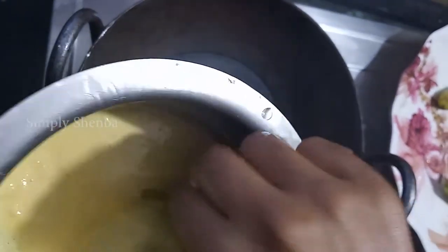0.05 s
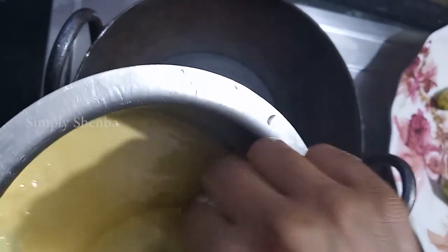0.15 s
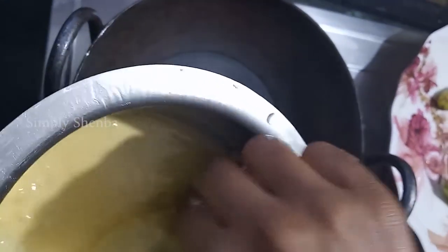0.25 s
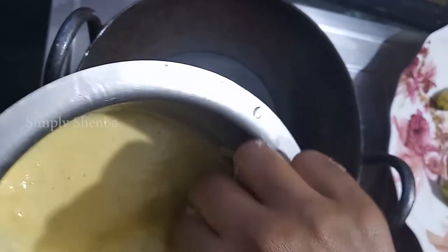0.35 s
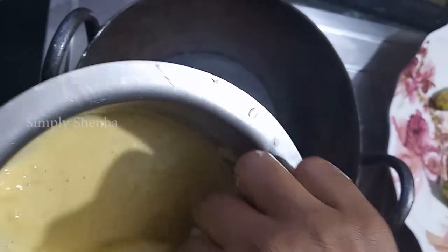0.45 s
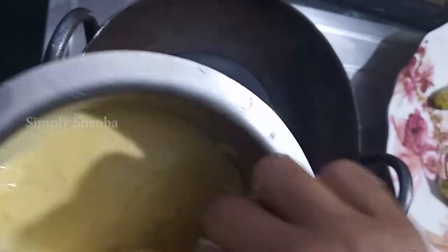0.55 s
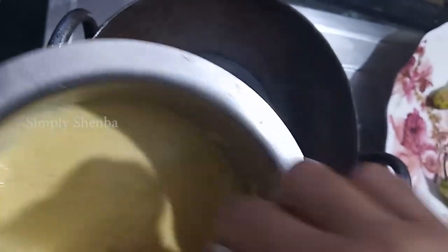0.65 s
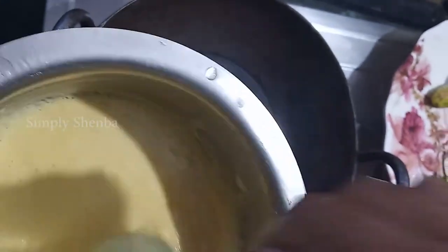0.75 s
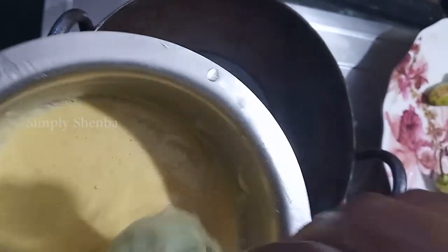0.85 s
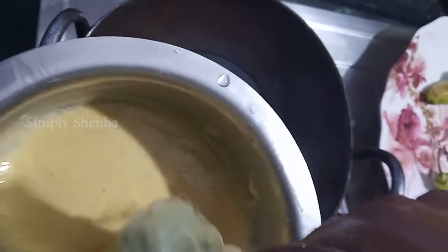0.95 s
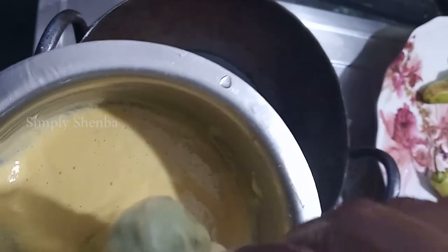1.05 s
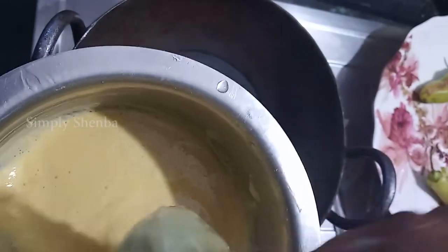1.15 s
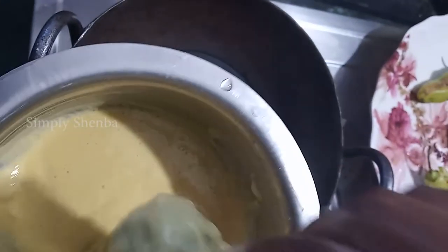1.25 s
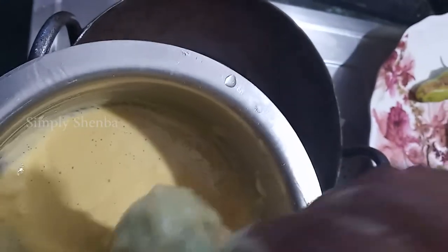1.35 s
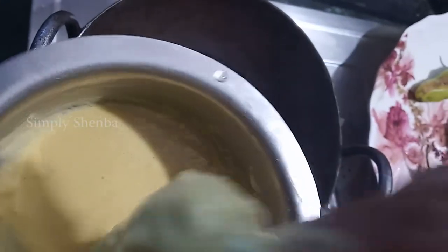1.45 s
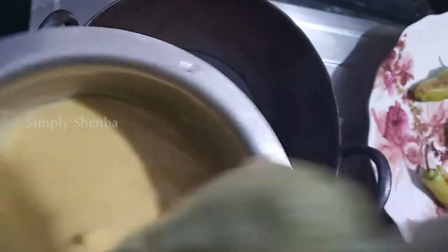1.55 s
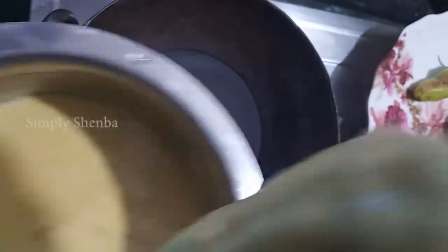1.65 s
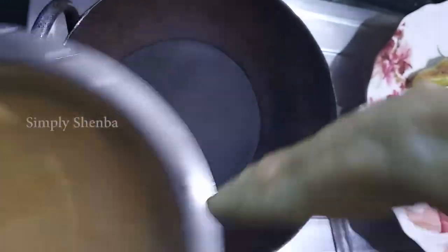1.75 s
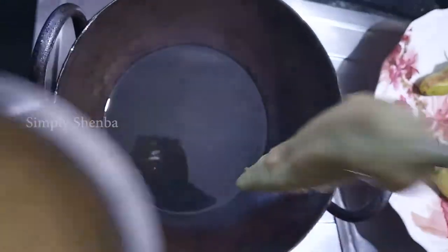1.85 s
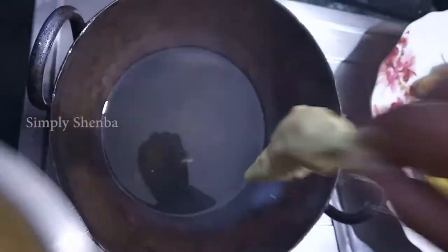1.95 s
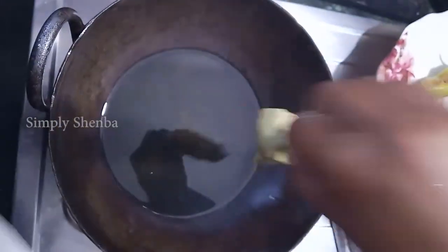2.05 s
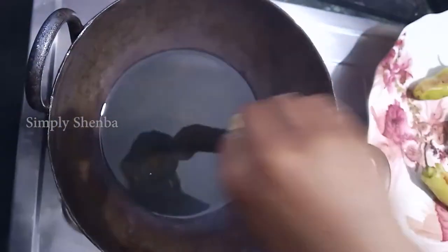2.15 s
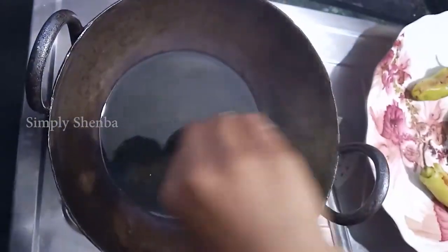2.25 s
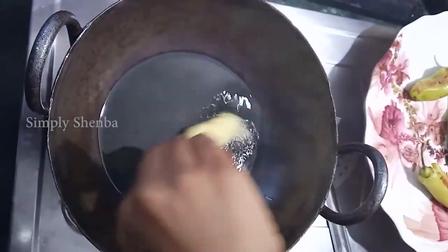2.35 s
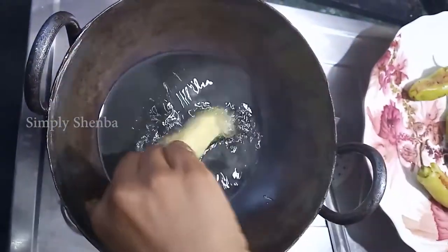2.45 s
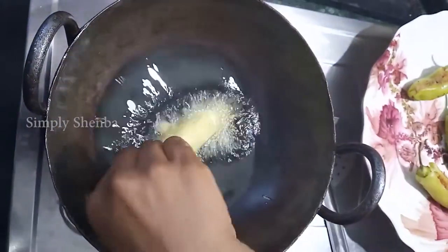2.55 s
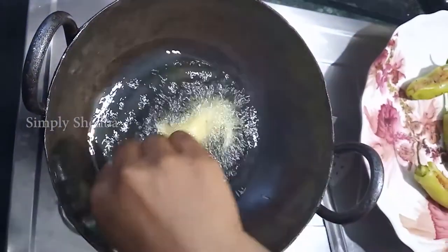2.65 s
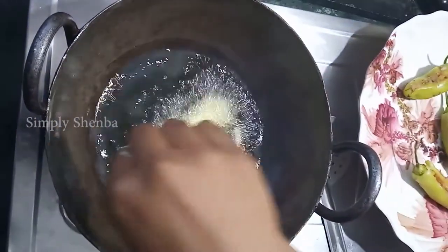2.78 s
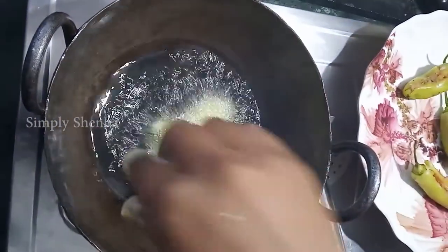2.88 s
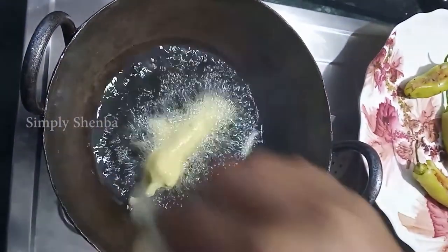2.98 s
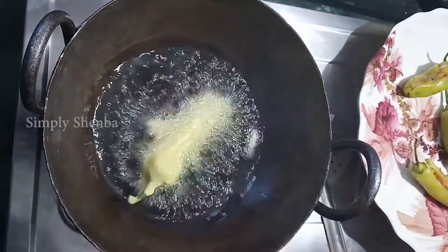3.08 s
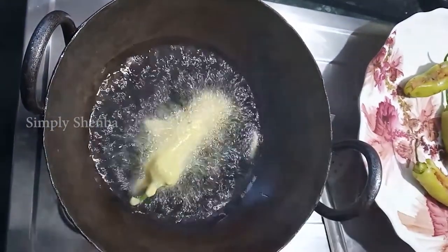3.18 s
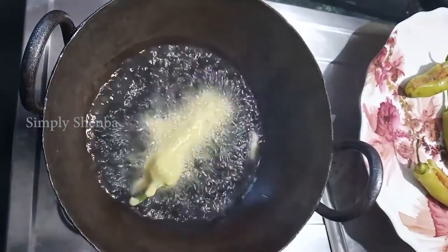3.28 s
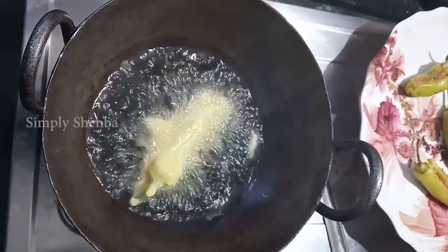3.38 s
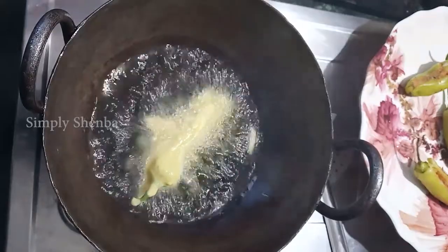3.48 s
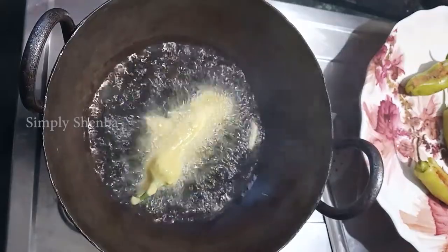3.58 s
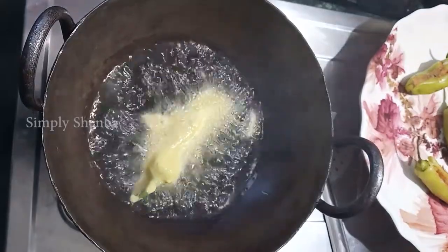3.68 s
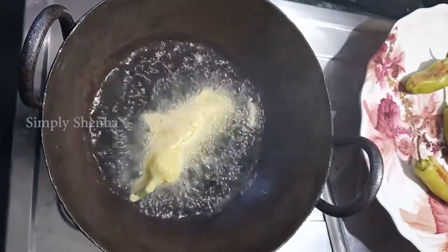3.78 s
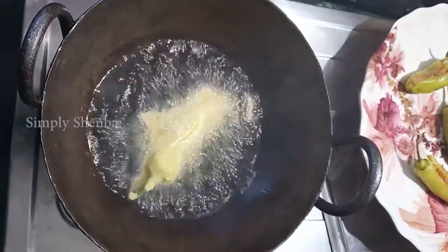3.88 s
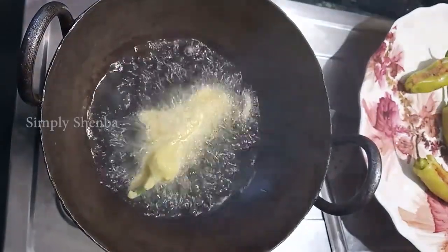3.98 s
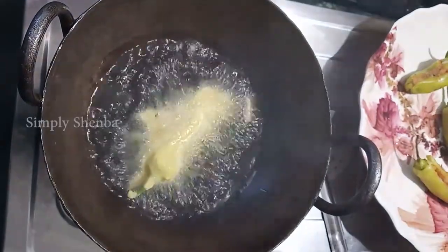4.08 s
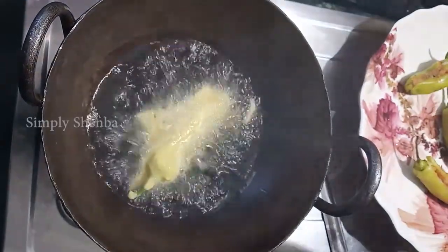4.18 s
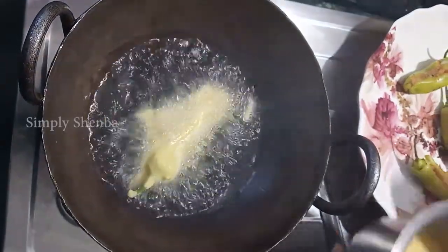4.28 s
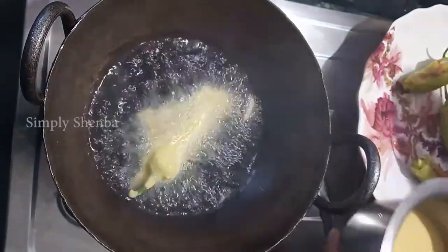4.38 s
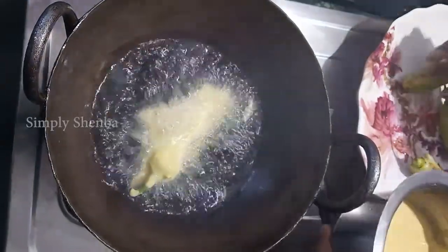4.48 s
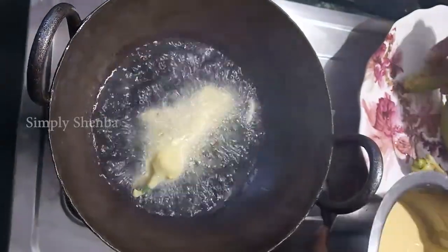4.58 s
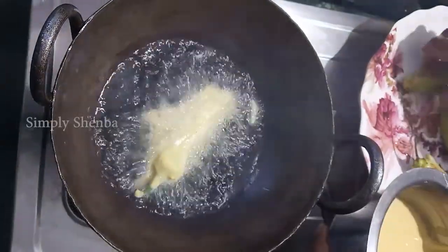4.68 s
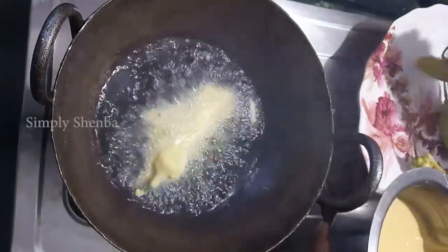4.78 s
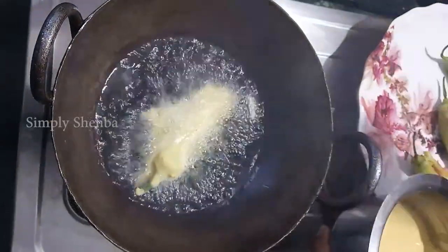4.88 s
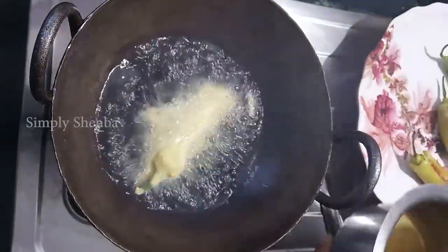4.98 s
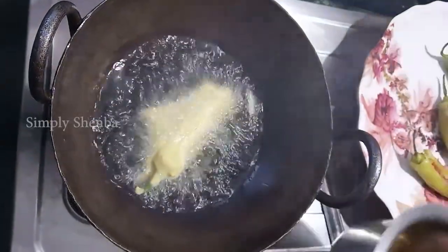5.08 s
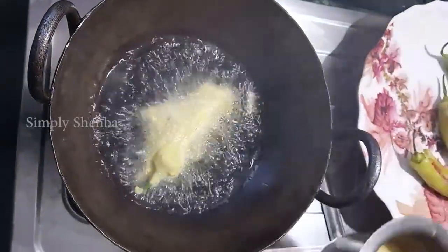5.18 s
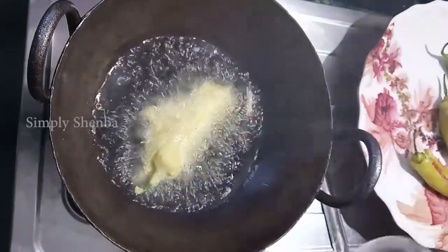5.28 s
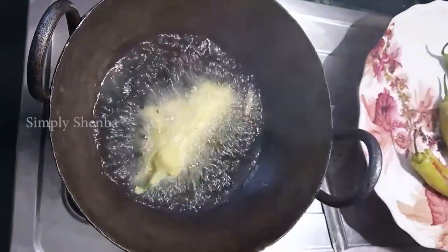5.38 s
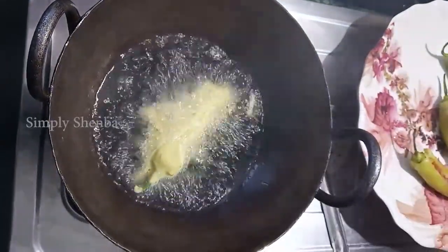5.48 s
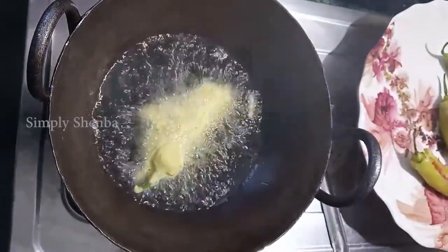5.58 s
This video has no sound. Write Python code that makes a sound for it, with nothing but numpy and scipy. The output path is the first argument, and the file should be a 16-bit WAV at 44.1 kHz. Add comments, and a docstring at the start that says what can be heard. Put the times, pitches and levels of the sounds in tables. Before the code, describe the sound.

A home kitchen, with the microphone close to the pan and a very faint room hiss. From 0 to 1.3 s a bird outside whistles one phrase four times, a short note then an arching, falling one, softened by echoes. A crow croaks at about 0.9 s and again, rougher, at 1.4 to 1.7 s. Fingers brush a steel bowl with tiny bright ticks, mostly 0.5 to 0.8 s, amid thin squeaks. It is nearly silent around 1.9 s. At 2.13 s batter touches hot oil: sizzling catches at once and swells by 2.4 s, dense, bright and bubbly, with a faint low handling rumble. Sharp spits snap over it, the strongest near 2.5 s and 3.0 s, the latter leaving a short hissing tail. At 3.64 s the frying steps down, thinner and crisper. From 4.5 s it grows hollower and fades, with a small knock-like crack at 4.8 s, spits around 5.2 s and little squeaks near 5.5 s.

```python
"""Battered chilli into hot oil

A home kitchen, pan close by, birds through the window: a whistled phrase repeats and a crow croaks, both
with an echoing tail; fingers tick on a steel bowl. Then the batter meets the oil: clicks ring resonators of
many pitches as bubbles burst, loud at first, a step quieter after a second and a half, with noise-puff spits
on top. Narrow noises, gliding squeaks, a low rumble and a very faint room hiss lie around them."""
import sys
import numpy as np
from scipy import signal
from scipy.fft import rfft, irfft
from scipy.io import wavfile

SR = 44100
rng = np.random.default_rng(int(sys.argv[2]) if len(sys.argv) > 2 else 0)


def wav_record(signal):
    """Record a signal, one row per channel, as 16-bit PCM in the file named by sys.argv[1]."""
    frames = np.transpose(np.atleast_2d(signal))
    bounded = np.clip(frames, -1, 1)
    # unit amplitude maps onto the largest positive 16-bit level
    quanta = np.round(bounded * 32767).astype(np.int16)
    wavfile.write(sys.argv[1], SR, quanta)


N = 248283
T = np.arange(N) / SR   # time [s]
# the batter touches the oil, the frying steps quieter, the colour moves on to its later, hollower form [s]
TOUCH_S, STEP_S, LATER_S = 2.127, 3.638, (4.5, 4.83)
# course of the frying, one list before and one after the step: (time [s], hiss level [dB], fizz level [dB],
# middle level [dB], gurgle level [dB])
FRY = [
    [(2.145, -50, -43.5, -65, -86), (2.169, -52, -46.5, -58.5, -48), (2.193, -48, -40, -55.5, -50.5),
     (2.239, -45, -48.5, -57.5, -53), (2.293, -51, -44, -53, -54), (2.379, -34.5, -35, -48.5, -49.5),
     (2.429, -40.5, -39, -52, -51.5), (2.511, -37.5, -40.5, -51, -55), (2.645, -39.5, -38.5, -51, -48.5),
     (2.657, -40, -39.5, -54, -56.5), (2.747, -39.5, -37, -49, -49), (2.987, -41.5, -39, -49.5, -47.5),
     (2.995, -39, -32, -47.5, -49), (3.049, -40.5, -37, -49.5, -48), (3.119, -43, -36.5, -48.5, -47.5),
     (3.603, -41.5, -41, -50, -51.5), (3.63, -43.5, -36.5, -51, -50)],
    [(3.645, -45.5, -49.5, -58, -58), (3.771, -45.5, -50.5, -60.5, -57.5), (3.909, -45, -52, -57, -63),
     (3.981, -47.5, -50, -60.5, -57), (4.059, -48, -51, -61.5, -65.5), (4.445, -48.5, -51.5, -62.5, -63),
     (4.777, -51, -52.5, -62.5, -64), (4.787, -52.5, -53.5, -62, -51), (4.993, -54, -51.5, -62.5, -66),
     (5.141, -57.5, -53.5, -66, -57.5), (5.175, -45, -51, -63.5, -58), (5.203, -50, -51, -65.5, -60),
     (5.225, -48, -50.5, -62, -59.5), (5.325, -54, -55.5, -70, -58.5), (5.341, -51, -51.5, -66, -57.5),
     (5.611, -63, -60.5, -82.5, -52.5), (5.63, -63, -62, -78, -55)],
]


def from_db(db):
    """Decibels to gain."""
    return 10 ** (np.asarray(db) / 20)


def rms_one(x):
    """Scale to rms 1."""
    return x / np.sqrt(np.mean(x ** 2) + 1e-30)


def in_time(rows):
    """Read the columns of a curve table at every sample; the first column is time [s]."""
    s, *columns = np.transpose(rows)
    return [np.interp(T, s, column) for column in columns]


def at_hz(points, hz):
    """Read a spectrum (frequency [Hz], level [dB]) on a log-frequency axis."""
    points = np.array(points)
    return np.interp(np.log(hz), np.log(points[:, 0]), points[:, 1])


def drift(rate_hz):
    """Slow chance of spread 1: noise through two equal low-pass poles, drawn every 40 samples."""
    r = np.exp(-80 * np.pi * rate_hz / SR)
    noise = rng.standard_normal(N // 40 + 2002)
    slow = signal.lfilter([1], [1, -2 * r, r * r], noise)[2000:]   # the filter has settled
    return np.interp(np.arange(N) / 40, np.arange(len(slow)), rms_one(slow))


def band(x, low_hz, high_hz, order=2):
    """Butterworth band-pass."""
    edges = [low_hz, min(high_hz, .49 * SR)]
    return signal.sosfilt(signal.butter(order, edges, "band", fs=SR, output="sos"), x)


def noise_band(hz, width_hz):
    """Steady noise around one pitch, rms 1."""
    return rms_one(band(rng.standard_normal(N), hz - width_hz / 2, hz + width_hz / 2, order=4))


def ring(clicks, hz, t60):
    """Each click sets a decaying sine ringing, 60 dB down after t60 seconds."""
    r, w = from_db(-60 / (t60 * SR)), 2 * np.pi * hz / SR
    return signal.lfilter([0, np.sin(w)], [1, -2 * r * np.cos(w), r * r], clicks + 1e-18)


def swell(start, end):
    """A quick rise and a slower fall, unsteady in level."""
    progress = np.clip((T - start) / (end - start), 0, 1)
    return np.sin(np.pi * progress ** 0.48) ** 2 * from_db(2.6 * drift(23))


def room_tone():
    """Very faint steady coloured noise, and a low handling rumble whose level varies."""
    # colour of the hiss: (frequency [Hz], relative level [dB per Hz])
    room_colour = [(12, -30), (20, 3), (53, -25), (186, -22.5), (888, -27.5), (2230, -33.5), (3680, -29.5),
                   (15700, -36)]
    # handling rumble: (time [s], level [dB])
    rumble_level = [(0.0, -100), (2.1, -106), (2.36, -75.5), (2.55, -88), (2.72, -101), (2.9, -87),
                    (3.7, -109), (5.63, -105)]
    room_db = -94.5
    hz = np.maximum(np.fft.rfftfreq(N, 1 / SR), 1)
    hiss = irfft(rfft(rng.standard_normal(N)) * from_db(at_hz(room_colour, hz)), N)
    rumble = band(rng.standard_normal(N), 54, 350, order=1) * from_db(4.7 * drift(4.2))
    return from_db(room_db) * rms_one(hiss) + from_db(in_time(rumble_level)[0]) * rms_one(rumble)


def wisps():
    """Faint narrow hisses: band-passed noise that swells and fades."""
    # (start [s], end [s], centre [Hz], width [Hz], level before the swell [dB])
    wisp_rows = [(0.03, 1.5, 500, 61, -99), (2.131, 2.28, 4660, 130, -50), (2.133, 2.32, 5420, 200, -46),
                 (2.5, 3.9, 515, 100, -80.5), (2.737, 3, 363, 73, -83.5), (4.85, 5.3, 2850, 34, -66),
                 (5.1, 6.3, 2700, 30.5, -73.5), (4.95, 5.5, 3290, 50, -72), (5.1, 5.4, 3540, 44, -72.5),
                 (5.37, 5.7, 978, 120, -65), (5.17, 5.2, 762.5, 100, -73), (-.2, 0.5, 1640, 520, -64),
                 (.5, 1.3, 1650, 480, -67), (0.183, 0.44, 798, 110, -75), (.215, 0.36, 9400, 4900, -83),
                 (0.535, 0.71, 9300, 2900, -81), (0.554, 0.72, 14800, 1900, -88),
                 (.76, 0.9, 5582, 1700, -87.5), (1.38, 1.53, 615, 116, -87), (1.7, 1.95, 1844, 40, -96),
                 (1.901, 2.1, 1840, 31, -95), (1.95, 1.93, 3680, 100, -98.5),
                 (2.081, 2.2, 7600, 190, -92.5), (.52, 0.71, 7000, 230, -81), (.64, 1.4, 7010, 280, -82),
                 (1.4, 1.8, 6980, 300, -93), (0.758, 0.93, 2993, 610, -86.5), (.76, 0.94, 3980, 360, -87),
                 (-.6, 4, 182.6, 12, -104), (1.518, 1.8, 3850, 140, -90.5), (1.42, 1.56, 1000, 100, -84),
                 (1.55, 1.67, 982, 60, -72), (1.776, 1.86, 3200, 200, -80.5), (2.084, 2.4, 2160, 160, -76),
                 (2.206, 2.52, 294, 81, -75), (5.39, 5.53, 483, 57, -79)]
    return sum(from_db(level_db) * swell(start, end) * noise_band(hz, width_hz)
               for start, end, hz, width_hz, level_db in wisp_rows)


def squeaks():
    """Thin gliding sines, blurred as fast chance multiplies each one."""
    # (start [s], end [s], from [Hz], to [Hz], rate of the blurring chance [Hz])
    glides = [(.16, .23, 4300, 4550, 60), (.185, .33, 4800, 4700, 60), (.49, .66, 5600, 5150, 100),
              (.1, .16, 2120, 2120, 40), (.53, .58, 2300, 2290, 40), (.76, .83, 2350, 2300, 40),
              (1.08, 1.17, 2150, 2120, 40), (.37, .42, 2450, 2400, 40), (.34, .47, 10650, 10500, 60),
              (.47, .56, 10600, 10500, 80), (.38, .58, 3100, 3000, 50), (.03, .12, 1540, 1580, 20),
              (.32, .39, 1480, 1640, 20), (.66, .72, 1580, 1640, 20), (1.15, 1.24, 1560, 1280, 15),
              (1.19, 1.4, 1580, 1700, 20), (1.45, 1.54, 1620, 1540, 15), (1.53, 1.62, 1680, 1170, 10),
              (3.78, 3.95, 2300, 2100, 40), (5.5, 5.58, 1950, 1830, 30), (5.545, 5.6, 2340, 2320, 30),
              (5.555, 5.66, 2150, 2120, 30), (5.43, 5.47, 990, 990, 20), (5.38, 5.42, 1380, 1370, 20)]
    # level of each glide before swell and blur [dB]
    glide_levels = (-72, -66, -80, -80, -82, -78, -84, -84, -84, -82, -92, -62, -60, -63, -60, -63, -61,
                    -56, -58, -56, -51, -54, -55, -55)
    out = 0
    for (start, end, from_hz, to_hz, width_hz), level_db in zip(glides, glide_levels):
        hz = np.interp(T, (start, end), (from_hz, to_hz))
        tone = np.sin(2 * np.pi * np.cumsum(hz) / SR)
        out = out + from_db(level_db) * swell(start, end) * drift(width_hz) * tone
    return out


def yard(x):
    """Walls outside smear a call into a dying tail of echoes, made with decaying noise."""
    t60_s, tail_db = 0.78, -6.5
    age = np.arange(round(t60_s * SR)) / SR
    tail = rng.standard_normal(SR)[:len(age)] * from_db(-60 * age / t60_s)
    return x + from_db(tail_db) * signal.fftconvolve(x, tail / np.sqrt(np.sum(tail ** 2)))[:N]


def crow():
    """Overtones of slow pulses near two gliding throat resonances; roughness shakes them and adds noise."""
    # one list a croak: (time [s], pulse rate [per s], throat low [Hz], throat high [Hz],
    # level before the yard [dB], roughness [0-1])
    croaks = [
        [(.9, 108, 1240, 1610, -87, 0.05), (.94, 107, 1290, 1616, -58, 0), (1.05, 103, 1240, 1550, -62, 0.13),
         (1.13, 104, 1175, 1480, -70.5, 0.07), (1.18, 99, 1070, 1438, -99, 0)],
        [(1.4, 122, 1347, 1900, -91, 0.42), (1.45, 103, 1430, 1987, -63, 0.25),
         (1.5, 103.5, 1445, 2000, -60, 0.25), (1.58, 102, 1425, 1940, -59, 0.21),
         (1.63, 93, 1300, 1780, -62, 0.42), (1.7, 86, 1333, 1781, -95, 0.77),
         (1.76, 96, 1290, 1740, -100, 0.38)],
    ]
    # for each croak: resonance width, level of the upper resonance against the lower
    throat_width_hz, upper_db = (75, 45), (-10, -2)

    def near(hz, centre_hz, width_hz):
        """Bell-shaped throat resonance."""
        return np.exp(-.5 * ((hz - centre_hz) / width_hz) ** 2)

    out = 0
    for rows, width_hz, high_db in zip(croaks, throat_width_hz, upper_db):
        rate, low_hz, high_hz, db, rough = in_time(rows)
        phase = 2 * np.pi * np.cumsum(rate * (1 + 0.025 * rough * drift(28))) / SR
        clean = 0
        for k in range(8, 25):
            throat = near(k * rate, low_hz, width_hz) + from_db(high_db) * near(k * rate, high_hz, width_hz)
            clean = clean + throat * np.sin(k * phase + 0.27 * k * k)
        breath = rms_one(band(rng.standard_normal(N), low_hz.min(), 0.98 * high_hz.max(), order=4))
        hoarse = breath * (1 + 0.84 * np.cos(phase))
        calling = (T > rows[0][0]) * (T < rows[-1][0])
        out = out + calling * from_db(db) * ((1 - rough) * clean + rough * hoarse)
    return out


def bird():
    """A near-pure whistle, a gliding sine, repeats one phrase; distance makes it flutter."""
    # phrases: (top of the arch [s], length against the usual, top [Hz], short note level [dB], arch level [dB],
    # falling end against the usual [dB])
    phrases = [(0.178, 0.89, 1880, -58.5, -56, 6.5), (0.495, 1.075, 1922, -55.5, -49.5, -3),
               (0.826, 1, 1921, -50.5, -47.5, 7), (1.14, .96, 1905, -53, -49, 4)]
    # shapes of the two notes: (time from the top of the arch [s], pitch as share of the top)
    short_note = [(-.103, .96), (-.088, .97), (-.072, .95), (-.055, .885), (-.04, .89)]
    arch = [(-.034, .95), (-.018, .98), (0, 1), (.024, .975), (.04, .92), (.068, .82), (.088, .73),
            (.105, .69)]
    # level at those points against the note's level [dB]
    short_note_db = (-8, -1.7, -10, -5, -9)
    arch_db = (-9, -1, -0.3, -4, -12, -9.5, -6.5, -18)
    note_fade_s = 0.0081
    fall_s = 0.084   # the falling end begins this long after the top, before stretching
    out = 0
    for top_s, stretch, top_hz, *levels_db, end_db in phrases:
        fall = np.clip((T - top_s) / (stretch * fall_s) - 1, 0, 1)
        for note, shape_db, level_db in zip((short_note, arch), (short_note_db, arch_db), levels_db):
            rows = np.column_stack([note, shape_db]) * [stretch, top_hz, 1] + [top_s, 0, level_db]
            hz, db = in_time(rows)
            to_edge = np.minimum(T - rows[0][0], rows[-1][0] - T)
            sounding = np.clip(to_edge / note_fade_s + .5, 0, 1) ** 2
            tone = np.sqrt(2) * np.sin(2 * np.pi * np.cumsum(hz) / SR)
            out = out + sounding * from_db(db + end_db * fall) * tone
    return out * from_db(3.1 * drift(38))


def ticks(count=4):
    """Fingers brush the bowl: small clumps of click grains ring its high modes unevenly."""
    # brushes: (time [s], relative level [dB])
    brushes = [(0.4868, -77), (0.5457, -71), (0.5644, -61.5), (0.5744, -66), (0.601, -63), (0.6449, -68),
               (0.6594, -73), (0.6764, -67.5), (0.7394, -78), (0.7794, -79), (1.3997, -73), (1.7794, -87)]
    # high modes of the bowl: (frequency [Hz], relative level [dB], t60 [s])
    bowl = [(5150, -11.5, 0.044), (6400, -6.5, 0.041), (7840, -0.5, 0.016), (9100, 3, .03),
            (9600, 3, 0.043), (10400, -10.5, .03), (11400, -4, 0.023), (12100, -7, 0.028),
            (13200, -4.5, 0.028), (14300, -4.5, .03), (15200, -5, 0.033)]
    clump_s, uneven_db = 0.016, 5   # longest delay of a grain, spread of its push on each mode
    s, db = np.repeat(brushes, count, axis=0).T
    late = rng.random(len(s)) * (np.arange(len(s)) % count > 0)   # the first grain is on time
    at = ((s + clump_s * late) * SR).astype(int)
    strengths = rng.standard_normal((len(s), len(bowl)))
    out = 0
    for (hz, level_db, t60), strength in zip(bowl, strengths.T):
        clicks = np.zeros(N)
        clicks[at] = from_db(db + level_db - 16.5 + uneven_db * strength)
        out = out + band(ring(clicks, hz, t60), .93 * hz, 1.07 * hz)
    return out


def burst(start, peak_db, hz, width_hz, t60):
    """A dying puff of noise in one band, scaled to its peak."""
    out, at = np.zeros(N), round(start * SR)
    age = np.arange(min(round(1.6 * t60 * SR), N - at)) / SR
    puff = rng.standard_normal(9000)[:len(age)] * from_db(-60 * age / t60)
    puff = band(puff, hz - width_hz / 2, hz + width_hz / 2, order=4)
    out[at:at + len(age)] = from_db(peak_db) * puff / np.abs(puff).max()
    return out


def spits(count=22):
    """Single droplets snap as short noise puffs, the stray ones at random; bigger cracks and knocks on the bowl
    leave a tail."""
    # the loudest spits of oil: (time [s], peak level [dB], centre [Hz])
    placed = [(2.312, -22, 6390), (2.337, -28, 6800), (2.372, -18, 7200), (2.471, -31, 6400),
              (2.4887, -20, 7600), (2.517, -15.5, 10300), (2.54, -31, 10400), (2.5556, -32, 7260),
              (2.589, -21, 10100), (2.697, -29, 6670), (2.997, -13, 6700), (3.1126, -27, 6300),
              (3.2471, -25, 6842), (3.867, -28, 9700), (4.0213, -32, 9300), (4.47, -32, 9700),
              (4.6702, -35, 9900), (5.1753, -26, 10050), (5.226, -32.5, 9700), (5.264, -31, 9340),
              (5.2841, -31.5, 9800), (5.343, -34.5, 7000)]
    # bigger cracks, and knocks on the bowl at 0.214 s and 4.79 s: (time [s], peak level [dB], centre [Hz],
    # width [Hz], t60 [s])
    hits = [(.214, -40, 10170, 2940, 0.025), (2.995, -18.5, 6480, 1730, 0.12),
            (4.7895, -32.5, 1470, 900, 0.01), (5.177, -37, 8200, 5000, 0.065)]
    spit_t60_s = 0.0035
    stray_db, stray_spread_db = 2, 10   # peak over the hiss curve
    stray_hz = (6300, 9800)             # centre before and after the step
    hiss_db = in_time(sum(FRY, []))[0]
    when, size = rng.random((count, 2)).T
    at = TOUCH_S + .1 + when * (T[-1] - TOUCH_S - .15)
    stray = []
    for s, x in zip(at, size):
        peak_db = hiss_db[int(s * SR)] + stray_db + stray_spread_db * (2 * x - 1)
        stray.append((s, peak_db, stray_hz[int(s > STEP_S)]))
    small = sum(burst(s, db, hz, 0.53 * hz, spit_t60_s) for s, db, hz in placed + stray)
    return small + sum(burst(*row) for row in hits)


def snaps():
    """Tiny dry clicks at random, all over the treble; rms 1."""
    per_s, spread_db = 140, 3
    sizes = from_db(spread_db * np.minimum(rng.exponential(1, N), 4)) * rng.choice([-1, 1], N)
    return rms_one(band(sizes * (rng.random(N) < per_s / SR), 3500, 19000))


def bubbles(low_hz, high_hz, per_s, spread_db, cycles, flicker_db, count=12):
    """Random bursts, each ringing for some cycles at the pitch of its bubble size; rms about 1."""
    # at first, before the step: (frequency [Hz], relative level [dB per Hz])
    fresh_colour = [(320, -57), (550, -40), (669, -1.5), (738, -11), (849, -9.5), (1110, -21.5),
                    (1410, -12.5), (1640, -17.5), (2470, -13.5), (6580, -6), (8120, -12.5), (9880, -10),
                    (15700, -11)]
    # after the step: (frequency [Hz], relative level [dB per Hz])
    after_step_colour = [(320, -68), (550, -47.5), (781, -48), (838, -21), (1020, -14), (1280, -7),
                         (1640, -16), (2140, -9), (2540, -10.5), (3500, -7.5), (9750, 0.5), (11900, -3.5),
                         (15700, -1.5)]
    # later, hollower: (frequency [Hz], relative level [dB per Hz])
    later_colour = [(320, -64), (550, -41.5), (977, -10), (1350, -2), (1920, -1.5), (2200, -29),
                    (2760, -17), (3000, -15.5), (4380, -1), (5970, 2), (7470, -1.5), (8350, -13.5),
                    (9750, 0), (11400, -23.5), (15700, -15)]
    grow_cycles = 87   # big bubbles take longer to form
    patchy_db = 1.5    # each pitch comes and goes on its own
    sizes = from_db(spread_db * np.minimum(rng.exponential(1, N), 5)) * rng.choice([-1, 1], N)
    born, dealt = rng.random(N) < per_s / SR, rng.integers(0, count, N)
    pitches = low_hz * (high_hz / low_hz) ** ((np.arange(count) + .5) / count)
    # evenly spaced in log pitch, so a higher one stands for more Hz
    fresh, after_step, later = (rms_one(from_db(at_hz(colour, pitches)) * np.sqrt(pitches))
                              for colour in (fresh_colour, after_step_colour, later_colour))
    out = 0
    for k, hz in enumerate(pitches):
        share = np.where(T < STEP_S, fresh[k], np.interp(T, LATER_S, (after_step[k], later[k])))
        formed = np.clip((T - TOUCH_S) * hz / grow_cycles, .01, 1) ** 6
        ringing = rms_one(ring(sizes * born * (dealt == k), hz, cycles / hz))
        out = out + share * formed * from_db(patchy_db * drift(5.5)) * ringing
    scale = np.sqrt(np.mean(out[T > 2.4] ** 2))   # once all have formed
    out = band(out, 0.942 * low_hz, 1.041 * high_hz, order=7)
    return out / scale * from_db(flicker_db * drift(6.3))


def pan(x):
    """Air in and over the pan favours or dulls some pitches; what lies under the largest bubbles is cut."""
    # resonances: (frequency [Hz], width [Hz], gain [dB])
    favoured = [(667.2, 8.8, 8.5), (872, 19, 6), (1010, 41, 7), (1414, 120, 4), (1990, 15, 5),
                (2758, 31, 6), (5000, 63, -2.5), (5250, 120, 0.5), (5680, 40, 4), (5910, 110, 2.5),
                (6390, 74, 4), (6680, 280, 3.5), (7270, 83, 5.5), (9700, 1200, 2.5)]
    out = x.copy()
    for hz, width_hz, db in favoured:
        r = np.exp(-np.pi * width_hz / SR)
        poles = [1, -2 * r * np.cos(2 * np.pi * hz / SR), r * r]
        out += (from_db(db) - 1) * signal.lfilter([(1 - r * r) / 2, 0, (r * r - 1) / 2], poles, x)
    return signal.sosfilt(signal.cheby2(4, 25, 480., "high", fs=SR, output="sos"), out)


def frying():
    """All bubble sizes follow the frying curves, drop at the step and drift on; silent until the touch."""
    # bubble sizes, low pitch to high: (low [Hz], high [Hz], bursts [per s], size spread [dB], cycles rung,
    # flicker [dB])
    bubble_sizes = [(503, 901, 430, 0.5, 21.4, 3), (932, 2184, 3000, 2, 64, 2),
                    (2124, 4460, 5700, -0.5, 84, -0.25), (4353, 8130, 8000, 1, 32, 0.67),
                    (8050, 10970, 8000, 2, 32, 0.7), (11350, 16000, 5400, -2, 9.2, -0.2)]
    # how each size follows: (base level [dB], share of the hiss swing, of the fizz swing, of the middle swing,
    # of the gurgle swing, drop at the step [dB], later sag [dB per s])
    follows = [(-61.5, 0.035, 0.028, .01, 1.34, 15.5, -5), (-56.5, 0.035, 0.04, .01, .9, -1, -0.3),
               (-56, 0.011, 0.039, 1, .05, -1.3, 2.5), (-47, .05, .95, 0.011, 0.04, 0, -1),
               (-48.5, 0.88, .1, .01, 0.043, -2, 0), (-47.5, 1, 0.043, .01, 0.056, -0.5, 9.5)]
    catch_s, catch_db = 0.014, 37   # the sizzle catches from this far below
    snap_db = -11                   # against the fizz
    swings = [db - db[T > TOUCH_S].mean() for db in in_time(sum(FRY, []))]
    levels = []
    for base_db, *shares, drop_db, sag_db in follows:
        swing_db = sum(share * swing for share, swing in zip(shares, swings))
        fallen_db = drop_db * (T > STEP_S) + sag_db * np.maximum(T - LATER_S[0], 0)
        levels.append(from_db(base_db + swing_db - fallen_db))
    catch = (T > TOUCH_S) * from_db(np.interp(T, (TOUCH_S, TOUCH_S + catch_s), (-catch_db, 0)))
    surge = from_db(1.0 * drift(42)) * catch
    oil = sum(level * bubbles(*size) for level, size in zip(levels, bubble_sizes))
    return surge * (from_db(-1.5) * pan(oil) + from_db(snap_db) * levels[3] * snaps())


def scene():
    """Pan close by, birds through the window."""
    # gain on the birds and their echoes, whose tails are cut short: (time [s], level [dB])
    outside_gain = [(0, 3.5), (1.26, 2), (1.38, -6.5), (1.46, 7), (1.66, 2.5), (1.76, -22), (1.85, -46)]
    outside = from_db(in_time(outside_gain)[0]) * band(yard(bird() + crow()), 1080, 2150, order=5)
    return (room_tone() + wisps() + squeaks() + outside + ticks() + spits() + frying())[None]


def record(dry):
    """A steep elliptic low-pass cuts the top of the treble."""
    cutoff_hz = 15750
    return signal.sosfilt(signal.ellip(14, .1, 70, cutoff_hz, fs=SR, output="sos"), dry)


dry = scene()
out = record(dry)
wav_record(out)
```